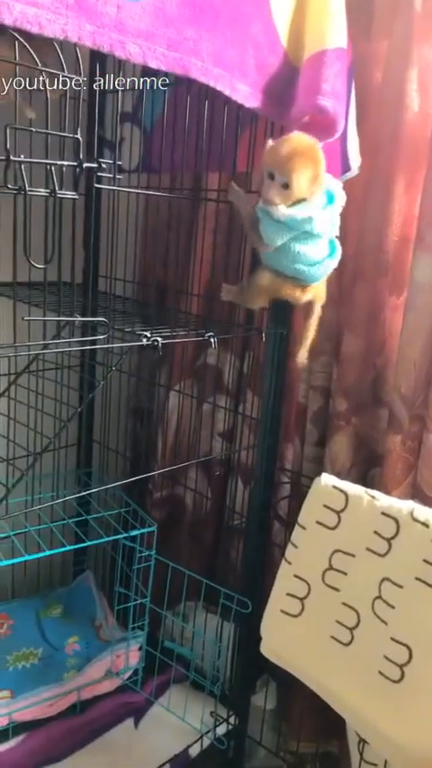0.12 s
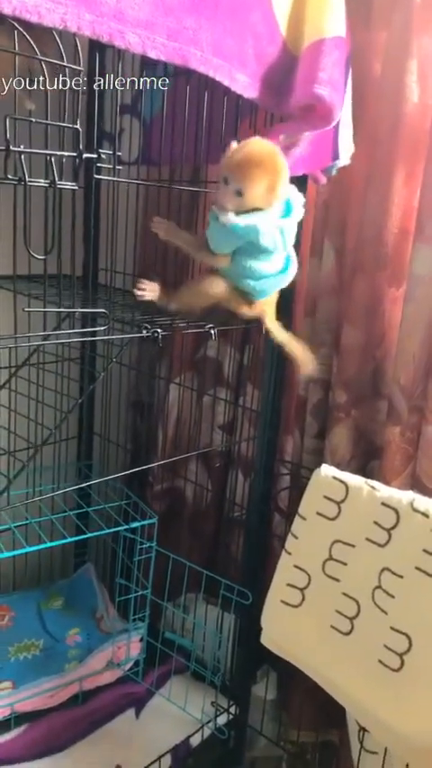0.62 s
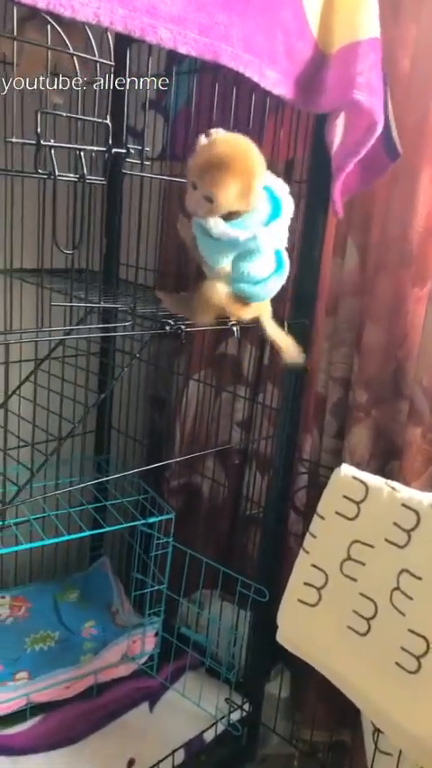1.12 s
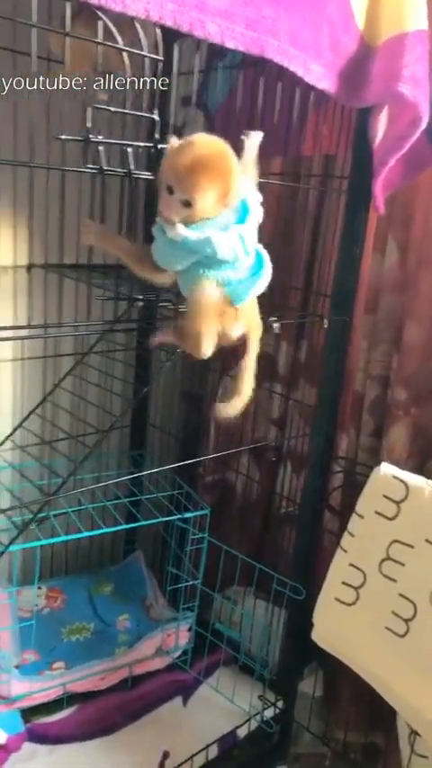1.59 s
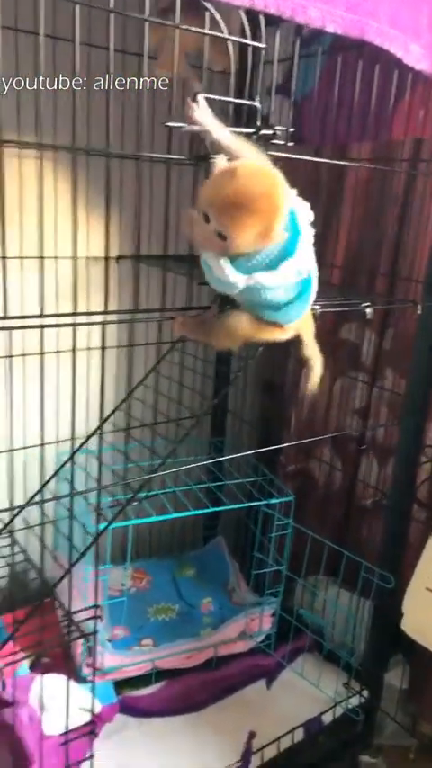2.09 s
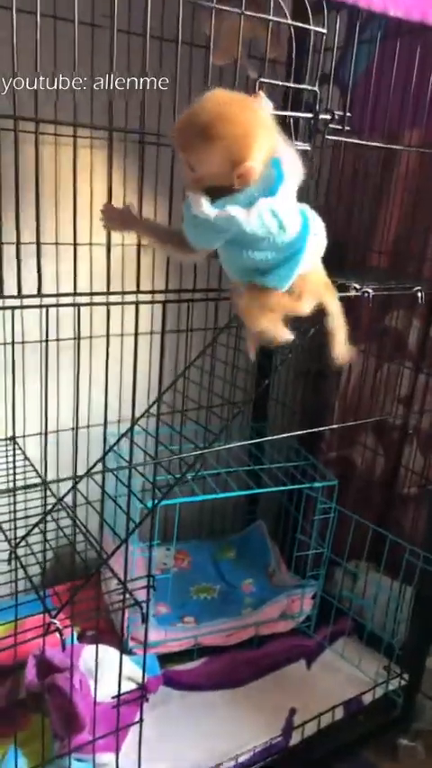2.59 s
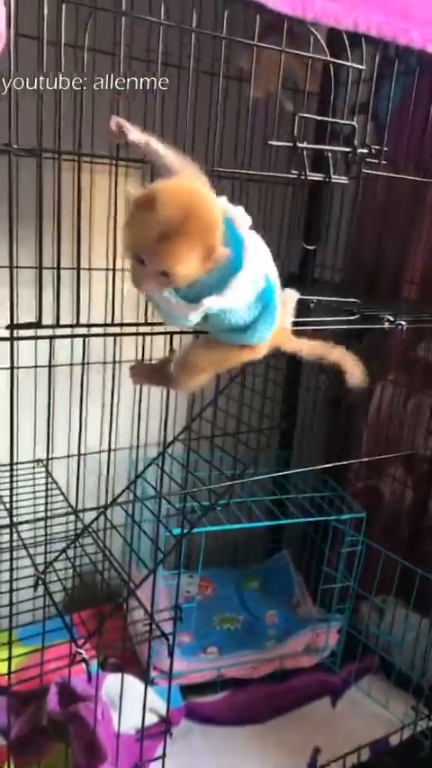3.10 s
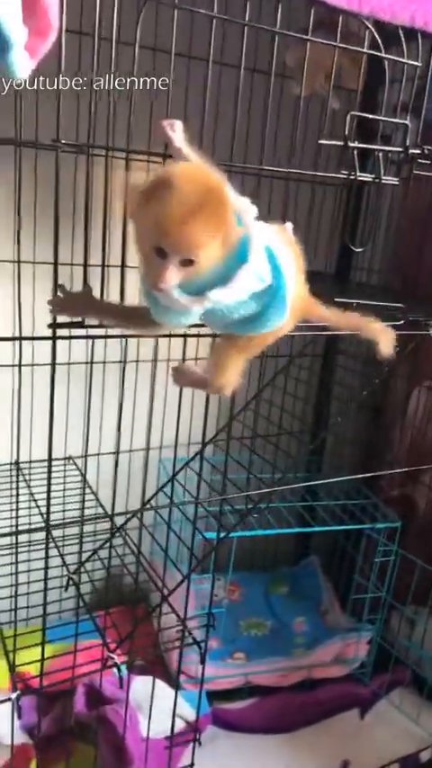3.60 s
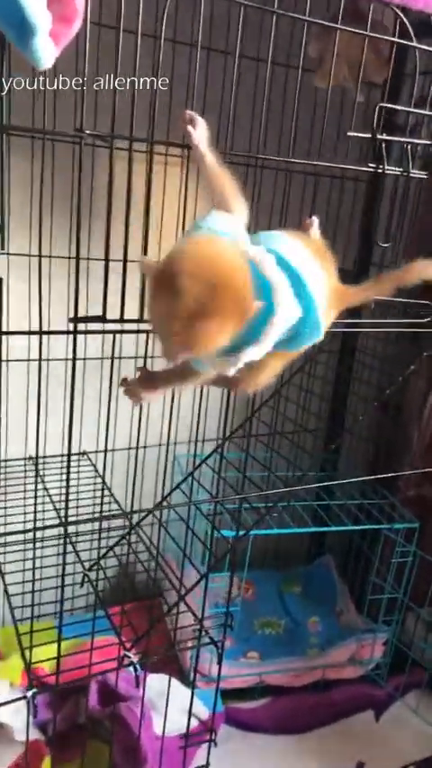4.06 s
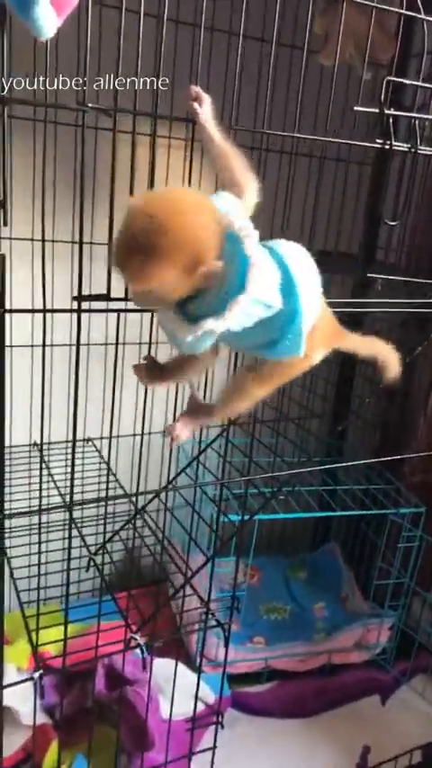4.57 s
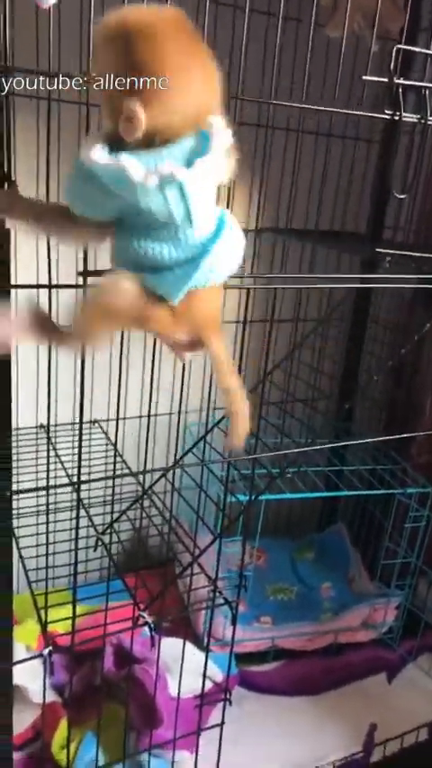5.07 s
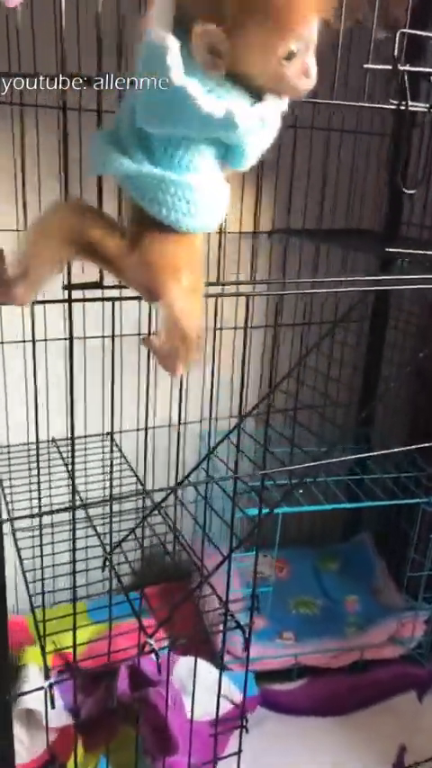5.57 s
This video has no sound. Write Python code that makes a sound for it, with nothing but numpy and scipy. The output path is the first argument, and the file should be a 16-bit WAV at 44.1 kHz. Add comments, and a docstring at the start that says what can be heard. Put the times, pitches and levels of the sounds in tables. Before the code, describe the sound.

A quiet indoor room with a low, soft rumble and faint high hiss. From 0.3 seconds a small monkey's hands and feet tap a wire cage, with light rattles around 0.6 to 0.8 and softer ones to 1.3. At 1.4 a sharp, bright clash of thin wires is the loudest metal hit, ringing briefly. Clatter continues from 1.6 to 1.8, then a dull, hollow knock of the frame on its base lands at 2.2. Another strong rattle comes at 2.65, and a second heavy knock at 2.9 with low shuddering and loose ticking. Smaller rattles thin out by 3.4. From 3.6 to 4.15 one clear, high coo rises quickly, wavers at its top and falls, slightly breathy and raspy, with small catches. Its short echo fades. Faint wire taps follow at 4.35, 4.9, 5.2 and 5.5, close to a nearby microphone.

```python
"""Monkey on a wire cage

A small monkey climbs a wire cage in a quiet room. Each hand or foot strikes the mesh: shaped noise clatters
and dies away, brighter around clusters of like wires. Single groups of wires ring on as beating bands, loose
wires tick, and low resonances shudder as weight shifts on the frame, which also knocks on its base.
Then one coo rises and falls, made of harmonic partials with breath and rasp. The room echoes voice and mesh."""
import sys
import numpy as np
from scipy import signal
from scipy.fft import rfft, irfft
from scipy.io import wavfile
from scipy.ndimage import uniform_filter1d

SR = 44100
rng = np.random.default_rng(int(sys.argv[2]) if len(sys.argv) > 2 else 0)


def wrap_up_sound(samples):
    """Save the sound to the file named by the first command line argument, as 16-bit audio."""
    columns = np.atleast_2d(samples).T
    # keep every value between -1 and 1, then stretch to whole-number steps
    tamed = np.clip(columns, -1, 1)
    steps = np.round(tamed * 32767).astype(np.int16)
    wavfile.write(sys.argv[1], SR, steps)


def gain_from_decibels(decibels):
    """Convert decibel values to linear amplitude factors."""
    exponent = np.asarray(decibels, float) / 20
    return 10 ** exponent


N = 250476  # length in samples


def evened(x):
    """Scales x to an rms of one."""
    return x / np.sqrt(np.mean(x ** 2) + 1e-20)


def read(points, hz, column=1):
    """Reads one column of a table at any pitch, along a logarithmic scale."""
    points = np.asarray(points)
    return np.interp(np.log(hz + 1), np.log(points[:, 0] + 1), points[:, column])


def add(mix, s, sound):
    """Adds a sound to the mix, starting at s seconds."""
    part = mix[round(s * SR):][:len(sound)]
    part += sound[:len(part)]


def colour(x, points):
    """Weighs the spectrum of x by a (Hz, dB) curve."""
    return irfft(rfft(x) * gain_from_decibels(read(points, np.fft.rfftfreq(len(x), 1 / SR))), len(x))


def smooth_noise(count, size):
    """Slow random wandering: noise averaged over size samples, with an rms of one."""
    return evened(uniform_filter1d(rng.standard_normal(count), size))


def resonant_noise(hz, width):
    """Noise heard through one resonance; width in Hz."""
    f = np.fft.rfftfreq(N, 1 / SR)
    spectrum = rfft(rng.standard_normal(N)) / (1 + (2 * (f - hz) / width) ** 2)
    return evened(irfft(spectrum, N))


# Colour of the quiet room. Each row: pitch in Hz, relative level in dB.
AIR = [(15, -45.5), (25, -7.5), (40, -2), (58, 0.5), (141, -3.5), (373, -11.5), (567, -16), (1210, -16.5),
       (2160, -20.5), (3200, -20.5), (5000, -24.5), (13200, -28)]
AIR_DB = -56
WHINE_HZ, WHINE_WIDTH, WHINE_DB = 8460, 180, -75  # width in Hz


def quiet_room():
    """Coloured noise that stirs a little, with a faint steady whine: noise through a narrow resonance."""
    air = gain_from_decibels(AIR_DB) * evened(colour(rng.standard_normal(N), AIR))
    air *= gain_from_decibels(0.51 * smooth_noise(N, 900))
    return air + gain_from_decibels(WHINE_DB) * resonant_noise(WHINE_HZ, WHINE_WIDTH)


def echoes_by_turns(x, paths):
    """The sound feeds two sets of random echoes by turns, which keeps their colour from standing still."""
    turn = 2 * np.pi * 9 * np.arange(N) / SR  # nine turns a second
    fed = x * np.array([np.cos(turn), np.sin(turn)])
    echoes = signal.fftconvolve(fed, paths / np.linalg.norm(paths[0]), axes=1)
    return echoes[:, :N].sum(0)


# How long echoes last. Each row: pitch in Hz, time to fall by 60 dB in seconds.
ROOM = [(500, 0.54), (1000, 0.53), (3000, 0.53), (10000, 0.19)]


def room(x):
    """Echoes as sparse taps of random sign, each band dying at its own speed."""
    taps = np.zeros((2, SR))
    at = np.arange(300, SR - 20, 20)
    for row in taps:
        row[at + rng.integers(0, 20, len(at))] = rng.choice([-1., 1.], len(at))
    hz, t, z = signal.stft(taps, SR, nperseg=256)
    fall_db = -60 * t / read(ROOM, hz)[:, None]
    tail = signal.istft(z * gain_from_decibels(fall_db), SR, nperseg=256)[1]
    return echoes_by_turns(x, tail)


# Left-right difference under the sum. Each row: pitch in Hz, level in dB.
APART = [(3600, -62), (4700, -18.5), (5800, -10), (8000, -8.5), (13000, -11.5)]


def left_right(both):
    """The two channels agree in the bass and hear the treble by different echoes."""
    paths = rng.standard_normal((2, 4000)) * gain_from_decibels(-np.arange(4000) * .012)
    apart = colour(echoes_by_turns(both, paths), APART)
    return np.array([both + apart, both - apart])


# Weight shifting on the frame. Each row: time in seconds, load in dB, sway in dB.
SHIFT = [(0, -59.5, -53.5), (.62, -57, -59), (.84, -53, -59), (1.37, -54, -57), (1.47, -46, -58),
         (1.69, -50, -58), (1.88, -50.5, -49.5), (2.28, -57, -63), (2.658, -54, -54.5), (2.89, -46.5, -48),
         (3.261, -54.5, -58), (3.97, -62, -63), (4.6, -60.5, -63), (5.68, -61.5, -56)]
# Low modes of the frame. Each row: pitch in Hz, width in Hz, relative level in dB.
FRAME = [(146.1, 53, -7), (216.5, 47, 1), (321, 95, 1.5), (443, 250, -2), (616, 68, -8.5), (914, 330, -1.5)]
SWAY_HZ, SWAY_WIDTH = 53, 15  # width in Hz
SWAY_STEADY = .4  # share of the sway's power that is one swing of nearly steady pitch


def frame():
    """Shifting weight keeps the low modes of the frame shuddering and the whole cage swaying."""
    t = np.arange(N) / SR
    s, *controls = np.transpose(SHIFT)
    load_db, sway_db = (np.interp(t, s, c) for c in controls)
    shudder = evened(sum(gain_from_decibels(db) * resonant_noise(hz, width) for hz, width, db in FRAME))
    drift = 3 * smooth_noise(N, 6000)  # Hz
    swing = np.sqrt(2) * np.sin(2 * np.pi * np.cumsum(SWAY_HZ + drift) / SR)
    loose = resonant_noise(SWAY_HZ, SWAY_WIDTH)
    sway = np.sqrt(SWAY_STEADY) * swing + np.sqrt(1 - SWAY_STEADY) * loose
    return gain_from_decibels(load_db) * shudder + gain_from_decibels(sway_db) * sway


# The frame jolts on its base. Each row: start in seconds, peak in dB, brightness in dB per octave,
# free ringing in seconds.
KNOCKS = [(0.318, -37, -1.5, 0.0023), (1.617, -29, 6.5, 0.0057), (2.197, -18, 7.5, 0.029),
          (2.878, -22, 3.5, 0.0081)]
# Modes of the base. Each row: pitch in Hz, relative level in dB, undamped time to fall by 60 dB in seconds.
BASE = [(372, 16.5, 0.12), (432, 16.5, 0.07), (789, 11.5, 0.077), (1247, 11.5, 0.026), (1600, 0.5, 0.038),
        (1960, -6.5, 0.04), (2655, -9.5, 0.043), (3090, -9, 0.038)]
BUILD_CYCLES = 1.1  # cycles each mode takes to build


def knocks():
    """A dull jolt rings the modes of the base together until the weight on it damps them."""
    t, out = np.arange(4000) / SR, np.zeros(N)
    for s, peak_db, tilt_db, free in KNOCKS:
        hit = np.zeros(len(t))
        for hz, db, t60 in BASE:
            level = gain_from_decibels(db + tilt_db * np.log2(hz / 800) - 60 * t / t60)
            build = 1 - np.exp(-t * hz / BUILD_CYCLES)
            hit += level * build * np.sin(2 * np.pi * hz * t)
        hit *= np.exp(-(t / free) ** 2)
        hit = colour(hit, [(200, -42), (330, 13)])[:len(t) // 2]  # too small to radiate bass
        add(out, s, gain_from_decibels(peak_db) * hit / abs(hit).max())
    return out


# Colour of the ticking. Each row: pitch in Hz, relative level in dB.
TICKS = [(300, -16.5), (600, -5), (1500, -1), (4000, -7), (8000, -7), (12000, -5)]
TICKS_PER_S, TICK_T60, TICK_SPREAD_HZ = 240, 0.12, 350  # t60: seconds to fall by 60 dB
REST_DB, TICKS_DB = -58, -13  # resting load, and ticking against it
TICKS_FOLLOW = 1.68  # dB of ticking for each dB of load above rest


def ticks(size=256):
    """Nails and loose wires touch at random on the loaded frame; each touch briefly rings one band of wires."""
    hop, hz = size // 4, np.fft.rfftfreq(size, 1 / SR)
    t = np.arange(N // hop + 5) * hop / SR
    chance, where = rng.random((2, len(t)))
    a, b = rng.standard_normal((len(t), len(hz), 2)).T
    strength = gain_from_decibels(3.5 * np.minimum(rng.exponential(1, len(t)), 3))
    strength *= chance < TICKS_PER_S * hop / SR
    centre = 13000 * where ** 1.5  # Hz
    touch = strength * np.exp(-.5 * ((hz[:, None] - centre) / TICK_SPREAD_HZ) ** 2)
    rung = signal.lfilter([1], [1, -gain_from_decibels(-60 * hop / SR / TICK_T60)], touch, axis=1)
    rung *= gain_from_decibels(read(TICKS, hz))[:, None]
    sound = evened(signal.istft(rung * (a + 1j * b), nperseg=size, noverlap=size - hop)[1][:N])
    s, load_db, _ = np.transpose(SHIFT)
    above_rest = np.interp(np.arange(N) / SR, s, load_db) - REST_DB
    return sound * gain_from_decibels(TICKS_DB + REST_DB + TICKS_FOLLOW * above_rest)


# Groups of like wires or frame bars set ringing on their own. Each row: pitch in Hz, time to fall by 60 dB
# in seconds, list of plucks; each pluck: start in seconds, level in dB.
RINGS = [(147.3, 0.43, [(.635, -50.5)]), (225.6, 0.38, [(.655, -41), (.82, -50)]),
         (320.6, 0.36, [(.636, -47.5), (.79, -40.5), (.83, -42.5)]), (592.4, 0.31, [(1.425, -44),
         (2.83, -43)]), (1235, 0.22, [(2.552, -45)]), (1336, 1.3, [(3.328, -51.5)]),
         (1360, 0.46, [(4.346, -52.5)]), (1766, 1.7, [(.762, -54.5)]), (11100, 0.95, [(2.89, -58)]),
         (2070, 0.7, [(1.21, -56.5)]), (2400, 0.21, [(2.44, -45.5), (2.55, -43.5), (3.325, -44.5)]),
         (2260, 0.36, [(5.225, -58), (5.457, -55)]), (3880, 0.1, [(.147, -56), (.762, -45), (1.42, -43)]),
         (2905, 0.58, [(.408, -59.5), (.762, -43.5), (1.001, -49.5), (2.829, -41)]),
         (3085, 0.93, [(1.421, -43)]), (4300, 1.4, [(.762, -52), (1.003, -61), (2.551, -53), (2.922, -51)]),
         (5750, 0.15, [(1.419, -28.5)]), (6020, 0.4, [(.763, -44)]), (6830, 0.19, [(1.418, -24.5),
         (4.928, -50.5), (5.457, -56)])]


def rings(count=40):
    """Like wires differ a little in pitch, so a group rings as a narrow, beating band."""
    t, out = np.arange(SR // 2) / SR, np.zeros(N)
    for hz, t60, plucks in RINGS:
        for s, db in plucks:
            spread, start = rng.standard_normal((count, 2)).T[:, :, None]
            wire_hz = hz + (.04 * hz + 10) * spread  # mismatch of 4 % and 10 Hz
            group = np.sin(2 * np.pi * (wire_hz * t + 2 * np.pi * start)).sum(0) / np.sqrt(count / 2)
            rise = 1 - np.exp(-t / 0.0086)
            fade = np.cos(np.pi * t)  # reaches silence after half a second
            add(out, s, group * gain_from_decibels(db - 60 * t / t60) * rise * fade)
    return out


def patchy(bands, frames, size):
    """Random dB pattern over pitch and time, in patches of size bands by three frames."""
    noise = uniform_filter1d(rng.standard_normal((bands, frames)), size, axis=0)
    return evened(uniform_filter1d(noise, 3, axis=1))


# Hand or foot on the mesh. Each row: start in seconds, relative blow in dB, basic ring time in seconds,
# thick bars in dB, thin wires in dB.
BLOWS = [(0.309, -33.5, 0.17, -4, 4), (0.4091, -39, 0.36, -1, 4), (0.625, -32.5, 0.4, 0, 6),
         (.758, -29.5, 0.6, 1, -3.5), (1.001, -40, 0.48, 8.5, 5), (1.204, -39.5, 0.52, -1.5, 2.5),
         (1.277, -38, 0.34, 6.5, -1.5), (1.418, -13.5, 0.5, -9.5, 3.5), (1.6293, -26.5, 0.42, -1.5, -4.5),
         (1.7362, -28, 0.46, 4, -6), (1.813, -26, 0.48, -3.5, 3), (2.195, -23, 0.091, 9, 8),
         (2.383, -41.5, 0.99, 1, 2.5), (2.4374, -31.5, 0.22, -4, -20), (2.546, -29.5, 0.55, -11, -4),
         (2.6466, -18, 0.43, -6, 6), (2.821, -24.5, 0.61, 4.5, -2.5), (2.918, -29.5, 0.46, 3.5, -9.5),
         (3.043, -26.5, 0.4, -1.5, -3.5), (3.1191, -30.5, 0.45, -4, -11), (3.3252, -36.5, 0.98, 2.5, -8),
         (3.4257, -25.5, 0.24, -1, -6.5), (4.345, -41, 0.38, 7.5, -2), (4.856, -36.5, 0.25, -13, -4),
         (4.924, -35, 0.46, -11, -1), (5.188, -38, 0.92, -9, -5.5), (5.455, -43.5, 0.62, 5, -1),
         (5.515, -44, 0.13, -2, 16)]
# Where the wire kinds lie: pitch in Hz of thick bars, common wire and thin wires.
WIRE_BANDS = [1100, 4300, 11000]
# Clusters of like wires. Each row: pitch in Hz, spread in Hz, relative level in dB.
MESH = [(930, 84, -21), (1360, 210, -14.5), (1778, 200, -9), (2430, 56, -19), (2810, 250, -1.5),
        (3670, 65, -6.5), (4060, 470, 2.5), (5790, 210, 1.5), (6240, 130, 3), (6800, 120, 2.5),
        (8200, 150, -5), (9000, 580, -3.5), (12100, 510, 7.5)]
# All other wires and joints. Each row: pitch in Hz, relative level in dB, factor on the basic ring time.
JOINTS = [(295, -24, 1.23), (580, 6.5, 1.8), (1510, 1.5, 2.33), (3010, 4, 1.38), (4560, 3, 0.81),
          (7500, 4.5, 0.76), (9800, 4.5, 0.69), (13730, 8, 0.079)]


def mesh(size=512):
    """So many wires ring at once that each blow is a dense clatter; the clusters stand out and last longer."""
    hz = np.fft.rfftfreq(size, 1 / SR)[:, None]
    t = np.arange(240) * size / 4 / SR
    clusters = sum(gain_from_decibels(db) * np.exp(-.5 * ((hz - f) / spread) ** 2) for f, spread, db in MESH)
    out = np.zeros(N)
    for s, db, t60, thick_db, thin_db in BLOWS:
        fall_db = -60 * t / (np.clip(t60, .04, 2.5) * read(JOINTS, hz, column=2))
        clatter = gain_from_decibels(read(JOINTS, hz) + 2.55 * fall_db)  # dies 2.55 times as fast as the clusters
        field = clatter + clusters * gain_from_decibels(-2.5 + fall_db)
        field *= gain_from_decibels(read(np.c_[WIRE_BANDS, [thick_db, 0, thin_db]], hz))
        field *= gain_from_decibels(2.8 * patchy(len(hz), len(t), 24))  # loose joints chatter in patches
        field *= gain_from_decibels(1.7 * patchy(len(hz), len(t), 60))  # wires slap back on each other in quick clumps
        a, b = rng.standard_normal((len(t), len(hz), 2)).T
        rung = signal.istft(field * (a + 1j * b), nperseg=size, noverlap=3 * size // 4)[1]
        spread_s = np.interp(db, [-40, -15], [.01, .004])  # softer blows spread slower
        rise = 1 - np.exp(-np.arange(len(rung)) / SR / spread_s)
        add(out, s, gain_from_decibels(db - 34.5) * rung * rise)
    return out


# Overtones against the fundamental. Each row: pitch in Hz, level in dB.
MOUTH = [(1900, -9.5), (2250, -13.5), (2660, -6), (3000, -8.5), (3330, -13.5), (3700, -20), (4000, -21.5),
         (4500, -34.5), (5200, -37), (6200, -40), (7700, -30.5), (9800, -45.5), (11500, -29), (13000, -34)]
PRESS = .07  # dB lost per overtone for each dB of missing effort
UPPER_SHARE = 0.62  # partials above the third follow the mouth opening less
LAG = .7  # radians each overtone trails the one below
SHIMMER_DB = -31  # quick unevenness of the overtones at middling roughness


def partials(hz, turn, effort_db, open_db, rougher_db, waver_db):
    """Harmonics of the voice: the mouth weighs the overtones, and each partial wavers."""
    weak_db = PRESS * np.minimum(effort_db + 22.5, 0)  # a weak voice loses its overtones from the top
    voice = gain_from_decibels(effort_db + 1.8 * waver_db[1]) * np.cos(turn)
    for k in range(2, 16):
        opening_db = open_db * (UPPER_SHARE if k > 3 else 1)
        level_db = effort_db + opening_db + (k - 2.5) * weak_db + read(MOUTH, k * hz) + waver_db[k]
        voice += gain_from_decibels(level_db) * np.cos(k * turn - LAG * (k - 1))
    shimmer = gain_from_decibels(SHIMMER_DB + rougher_db) * smooth_noise(len(turn), 60)
    return voice + shimmer * (voice - gain_from_decibels(effort_db) * np.cos(turn))


# Colour of the rasp and of the lines between overtones. Each row: pitch in Hz, relative level in dB.
RASP = [(1200, -15), (2000, -10), (2800, -12), (3250, -2), (3800, -16.5), (4300, -35.5)]
BREATH_STEEP = 1.2  # dB of breath and in-between lines for each dB of roughness
HALF_DB = -28.5  # in-between lines against effort at middling roughness, before the RASP colour


def alternation(hz, turn, effort_db, rougher_db):
    """Strong and weak cycles alternate, which puts lines halfway between the overtones; it comes and goes."""
    level_db = effort_db + HALF_DB + BREATH_STEEP * rougher_db
    lines = sum(gain_from_decibels(level_db + read(RASP, k * hz / 2)) * np.cos(k * turn / 2) for k in (3, 5, 7))
    uneven = uniform_filter1d(uniform_filter1d(rng.standard_normal(len(turn)), 200), 120)
    return evened(uneven) * lines


# Colour of the breath. Each row: pitch in Hz, relative level in dB.
BREATH = [(3800, -24.5), (6000, -6.5), (9800, -9.5), (12000, 0)]
BREATH_DB, RASP_DB = -29.5, -35.5  # against effort, at middling roughness
PUFF_DB, PUFF_S = 16, .055  # extra breath as the voice starts, and how fast it closes off in seconds


def breath_and_rasp(since, turn, effort_db, rougher_db, waver_db):
    """Coloured noise puffs out once a cycle; breath grows faster with roughness than the rasp."""
    puff_db = PUFF_DB * np.exp(-(since / PUFF_S) ** 2)
    breath_db = effort_db + BREATH_DB + puff_db + BREATH_STEEP * rougher_db
    rasp_db = effort_db + RASP_DB + rougher_db
    breath = evened(colour(rng.standard_normal(len(turn)), BREATH)) * (1 + 0.57 * np.cos(turn))
    rasp = evened(colour(rng.standard_normal(len(turn)), RASP)) * (1 + np.cos(turn))
    rasp *= gain_from_decibels(4 * waver_db)
    return gain_from_decibels(breath_db) * breath + gain_from_decibels(rasp_db) * rasp


# The voice catches. Each row: start in seconds, peak in dB, pitch in Hz.
CATCHES = [(3.594, -31.5, 5950), (3.73, -18, 2296), (3.811, -28, 1882)]


def catches():
    """Each catch of the voice is a pulse of a few cycles under a bell-shaped envelope."""
    out = np.zeros(N)
    for s, db, hz in CATCHES:
        cycles = np.arange(200) / SR * hz
        add(out, s, gain_from_decibels(db) * np.cos(2 * np.pi * cycles) * np.exp(-(cycles / 0.74 - 2) ** 2))
    return out


# Course of the coo. Each row: time in seconds, pitch in Hz, effort in dB, mouth opening in dB, roughness in dB.
COO = [(3.593, 882, -36.5, -3, -36), (3.624, 1004, -23.5, -7.5, -27), (3.647, 1110, -20, -2.5, -24.5),
       (3.671, 1186, -16.5, 0, -37), (3.716, 1252, -13.5, -4.5, -53), (3.744, 1248, -16.5, 4, -43.5),
       (3.778, 1223, -15, 0.5, -36), (3.812, 1277, -15, 6, -37), (3.849, 1328, -17.5, 7.5, -34),
       (3.886, 1319, -16.5, 8.5, -33.5), (3.917, 1255, -15, 6.5, -32), (3.961, 1243, -13.5, -2, -40.5),
       (3.996, 1195, -15, 1, -31.5), (4.018, 1110, -20, 6.5, -34), (4.049, 1109, -19.5, 3.5, -33.5),
       (4.076, 1071, -21.5, 3.5, -27), (4.11, 999, -20.5, -10, -24), (4.135, 911, -30, -5, -32),
       (4.152, 895, -32, -15, -28)]
MIDDLING_DB = -31  # middling roughness


def coo():
    """A clean harmonic voice with a slight tremble, some breath and rasp, and a few catches."""
    s, *columns = np.transpose(COO)
    t = np.arange(s[0], s[-1], 1 / SR)
    hz, effort_db, open_db, rough_db = (np.interp(t, s, c) for c in columns)
    hz = uniform_filter1d(hz, size=400) * (1 + 0.0043 * smooth_noise(len(t), 200))
    turn = 2 * np.pi * np.cumsum(hz) / SR
    rougher_db = rough_db - MIDDLING_DB
    waver_db = uniform_filter1d(uniform_filter1d(rng.standard_normal((16, len(t))), 500), 300)
    waver_db /= waver_db.std()
    waver_db[4:] *= 3.2  # the high partials come and go
    waver_db[:4] *= .45  # the low ones are steadier
    voice = partials(hz, turn, effort_db, open_db, rougher_db, waver_db)
    voice += alternation(hz, turn, effort_db, rougher_db)
    noise = breath_and_rasp(t - s[0], turn, effort_db, rougher_db, waver_db[0])
    out = catches()
    add(out, s[0], (np.sqrt(2) * voice + noise) * signal.windows.tukey(len(t), .03))
    return out


# What the walls return of the voice. Each row: pitch in Hz, relative level in dB.
WALLS = [(800, -0.5), (1300, -3), (2000, 1), (2550, -2), (2950, 0.5), (3400, -3), (6000, -13.5)]


def scene():
    """Mixes the quiet room, the cage, the coo and their echoes into two channels."""
    voice, cage = coo(), mesh() + rings() + ticks()
    echoes = room(gain_from_decibels(-18.5) * colour(voice, WALLS) + gain_from_decibels(-6.0) * cage)
    return left_right(voice + cage + echoes + knocks() + frame() + quiet_room())


def roll_off(x):
    """The treble ends steeply here."""
    return signal.sosfilt(signal.butter(12, 14240, fs=SR, output="sos"), x)


def record(dry):
    """Cuts off the treble above 13280 Hz with a steep low-pass filter."""
    low_pass = signal.firwin(1023, 13280, window=("kaiser", 9), fs=SR)
    limited = signal.oaconvolve(dry, low_pass[None], "same")
    return roll_off(limited)


dry = scene()
out = record(dry)
wrap_up_sound(out)
```